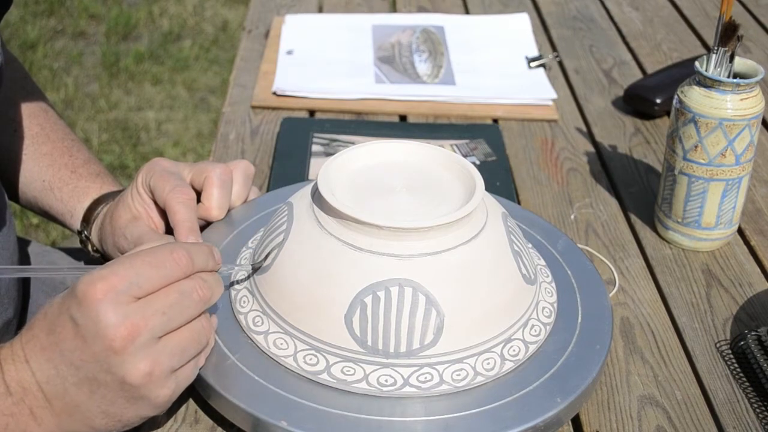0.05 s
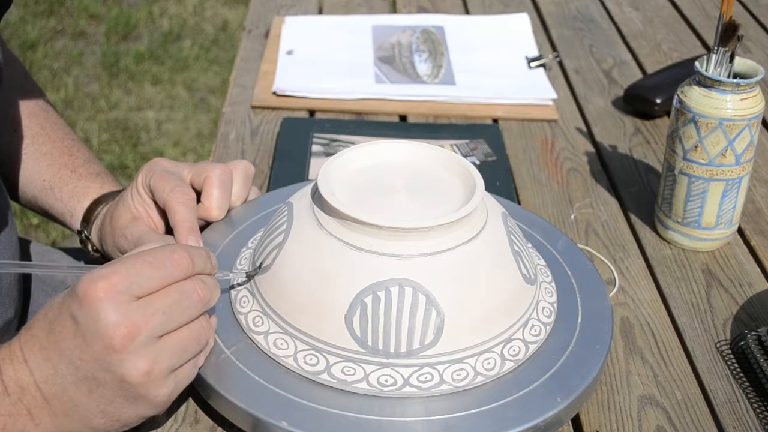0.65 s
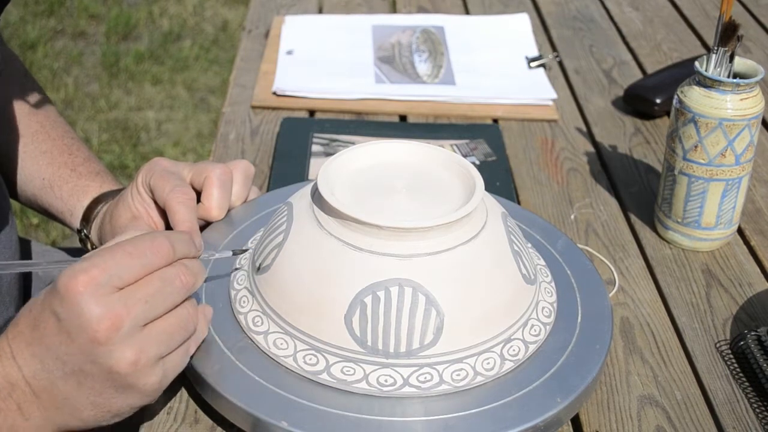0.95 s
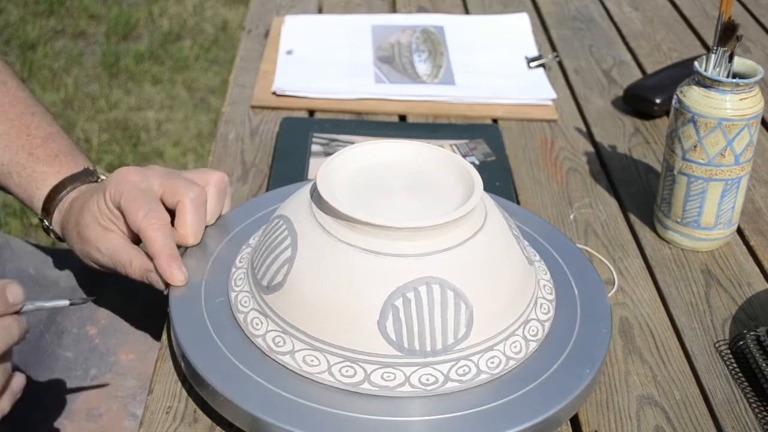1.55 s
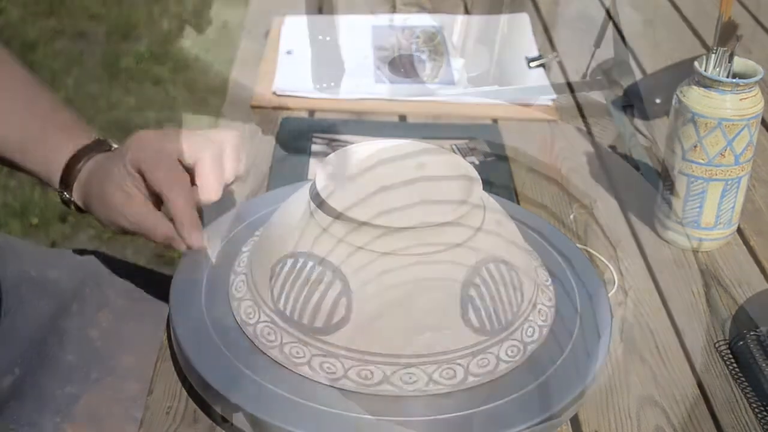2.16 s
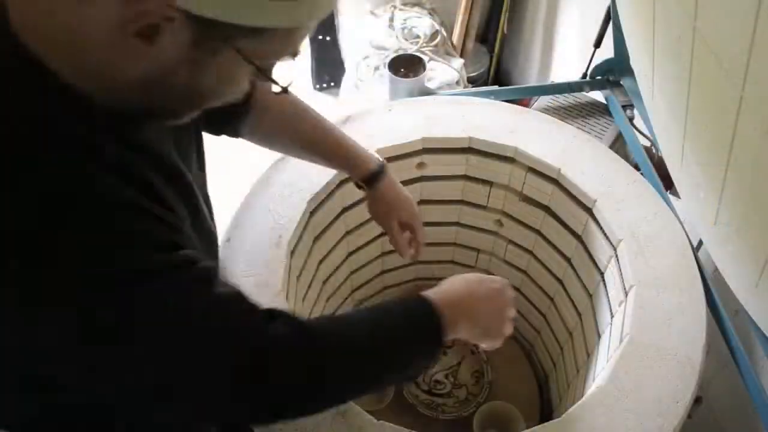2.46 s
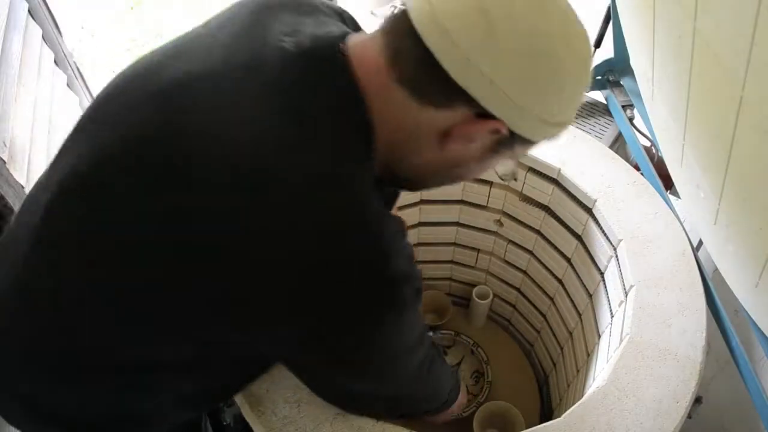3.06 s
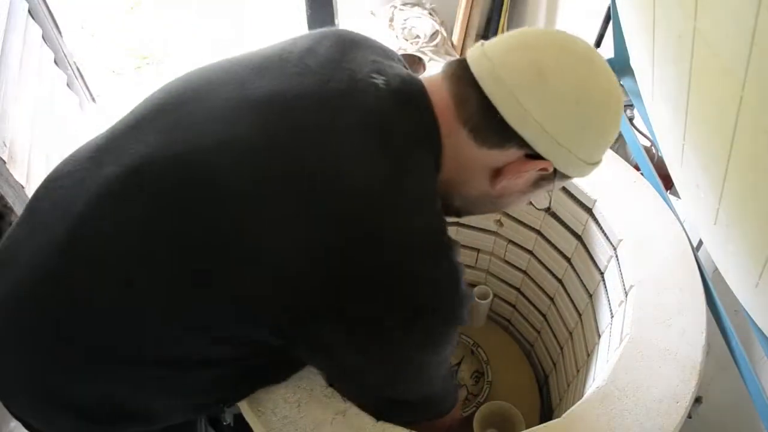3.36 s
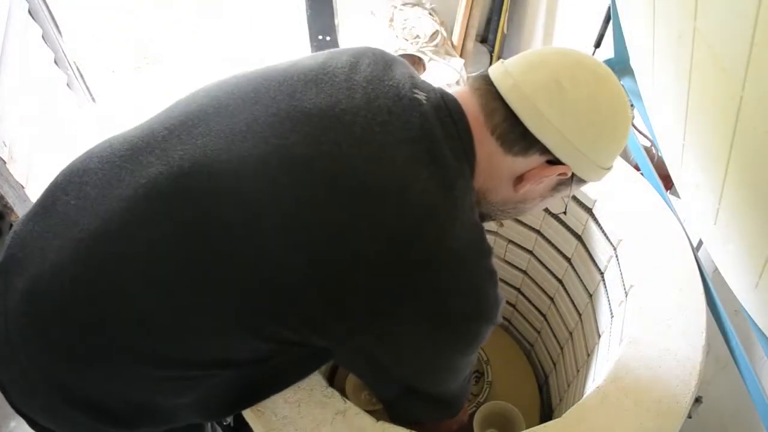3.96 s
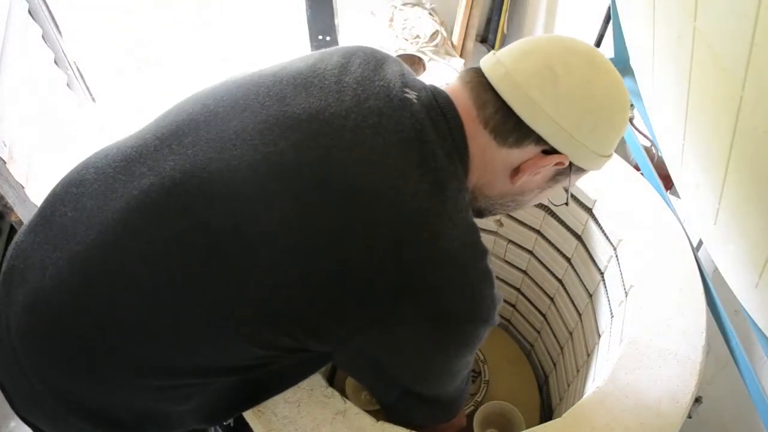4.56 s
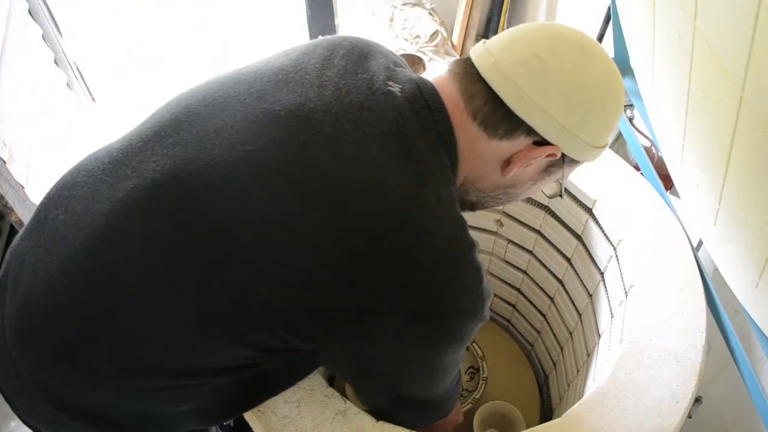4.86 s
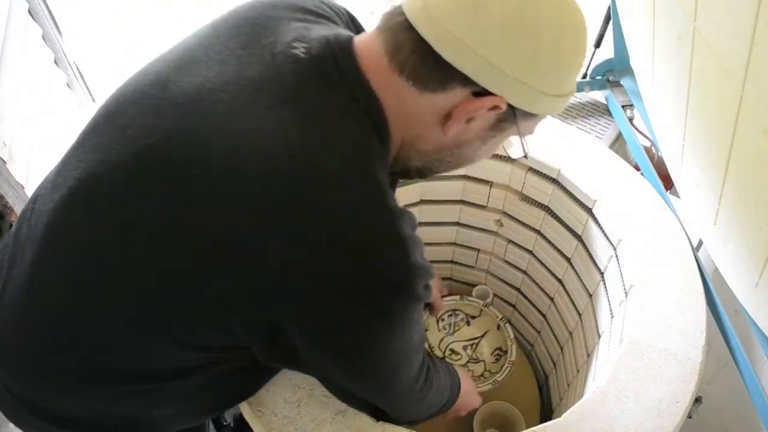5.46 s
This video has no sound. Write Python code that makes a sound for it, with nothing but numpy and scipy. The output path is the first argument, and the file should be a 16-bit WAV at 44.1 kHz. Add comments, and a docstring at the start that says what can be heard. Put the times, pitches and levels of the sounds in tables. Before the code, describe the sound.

Breeze and low wind thumps on the microphone give way to quieter air, a short gritty scrape, and a soft pottery knock.

```python
"""A clay bowl is lowered into a brick kiln: one gritty scrape, a few ticks, a brush of the potter's
sleeve, then a soft rubbing knock that rings the ware. Grains catch and slip to make each rub.
Before this we are at his outdoor painting table, where a breeze hisses in the leaves and gusts
buffet the microphone with rumble and slaps. That scene dissolves into the quieter air of the
kiln shed, with birds whistling far off."""
import sys
import numpy as np
from scipy import signal
from scipy.fft import rfft, irfft, next_fast_len
from scipy.io import wavfile
from scipy.ndimage import uniform_filter1d

SR = 44100
rng = np.random.default_rng(int(sys.argv[2]) if len(sys.argv) > 2 else 0)


def generate_wav(sig):
    """Save sig (samples, or channels by samples) to the path in sys.argv[1] as 16-bit PCM at SR."""
    pcm = np.round(np.clip(np.atleast_2d(sig).T, -1, 1) * 32767).astype(np.int16)
    wavfile.write(sys.argv[1], SR, pcm)


N = 251811
TIME, BINS = np.arange(N) / SR, np.fft.rfftfreq(N, 1 / SR)
DISSOLVE_START_S, DISSOLVE_END_S = 2, 2.49

# Tone of the leaves and of the shed air. Each row: frequency in Hz, relative level in dB.
LEAF_COLOUR = [(40, -6), (120, -13.5), (300, -4.5), (500, 0.5), (900, 0), (1900, -2.5), (3600, -3.5),
               (5000, -8), (6500, -13), (9000, -15.5), (11000, -22)]
SHED_COLOUR = [(25, -25), (60, -13.5), (120, -9), (250, -3), (500, 0), (900, -1.5), (1500, -3.5),
               (2200, -5), (3600, -6.5), (4600, -10.5), (6500, -15), (9000, -18.5), (11000, -23)]
# Strength of the breeze, ahead of the dissolve. Each row: time in seconds, level in dB.
BREEZE_LEVEL = [(.6, -56.5), (1.3, -56), (2.0, -56)]
# Far birds. Each row: start in seconds, length in seconds, starting pitch in Hz, level in dB.
BIRD_NOTES = [(2.6, .31, 5050, -70), (2.7, .17, 4720, -76), (3.07, 0.16, 3520, -71.5),
              (3.5, 0.31, 3690, -74), (3.83, .38, 3070, -73), (4.44, .26, 3870, -70.5),
              (5.18, .47, 2720, -74.5)]
# Gusts on the microphone. Each row: peak time in seconds, strength in dB, half-width in seconds.
GUST_SWELLS = [(.19, -52, 0.023), (.26, -45, .03), (.45, -60.5, 0.11), (.57, -49.5, 0.033),
               (.67, -55, 0.022), (.78, -55.5, 0.038), (1.358, -42.5, .024), (1.465, -41, .025),
               (1.535, -39, 0.045), (1.68, -37, .056), (1.81, -47, .08), (2.07, -56.5, 0.029),
               (2.17, -58.5, .035), (2.29, -61.5, .025), (2.38, -53, .022)]
# Tone of their rumble. Each row: frequency in Hz, relative level in dB.
GUST_COLOUR = [(12, -39), (25, -17), (55, 2.5), (120, 1.5), (200, -5.5), (300, -10.5), (420, -15.5),
               (600, -22.5), (1000, -67)]
# The hardest eddies, which slap the microphone. Each row: time in seconds, strength in dB.
EDDY_SLAPS = [(.228, -41), (0.5592, -39), (.67, -39), (1.3709, -33), (1.5082, -28), (1.5548, -20.5),
              (1.672, -30.5), (1.7046, -18.5), (1.7436, -32), (1.772, -33), (1.836, -40), (2.293, -46)]
# Small ticks of brush and ware. Each row: start in seconds, strength in dB, centre in Hz,
# spread in octaves, time to fall 60 dB in seconds.
WARE_TICKS = [(2.2007, -40.5, 3300, 0.9, 0.08), (2.26, -49.5, 6000, 1.1, .1), (2.468, -57, 7000, .05, .08),
              (2.943, -42.5, 4300, 1.5, .11), (3.233, -57, 8000, .6, .08), (4.215, -48.5, 5000, 0.75, 0.06),
              (4.288, -60, 6400, .015, 0.16), (4.732, -49, 3000, 0.47, .035)]
# Three rubs: sleeve on the kiln rim, clay dragged over firebrick, bowl settling on its shelf.
# Each row: start in seconds, attack in seconds, top level in dB, time to fall 60 dB in seconds.
SLEEVE_MOVES = [(2.96, .125, -61.5, .28)]
SCRAPE_MOVES = [(2.527, 0.047, -39.5, 0.29)]
SETTLE_MOVES = [(4.283, 0.014, -67, .9), (4.35, .052, -51, 0.21)]
# Tone of the cloth or grit in each rub. Each row: frequency in Hz, relative level in dB.
SLEEVE_COLOUR = [(60, -24), (150, -10), (300, 3.5), (600, -9), (1500, -0.5), (2400, -10), (5000, -22),
                 (11000, -24)]
SCRAPE_COLOUR = [(80, -31), (190, -10), (360, -12), (500, 0), (800, -3.5), (1020, -5), (1500, -2),
                 (2600, -6.5), (4000, -5.5), (5200, -12.5), (6300, -14), (9200, -18), (11000, -22.5)]
SETTLE_COLOUR = [(70, -35), (140, -13), (220, -1.5), (400, -3), (720, -10), (950, -3.5), (1200, -20),
                 (1500, -7), (1900, -23.5), (3300, -22), (5000, -28), (7000, -29.5), (9400, -26),
                 (11000, -21)]
# Ring of bowl and brick. Each row: frequency in Hz, width in Hz, level against the grit in dB.
SCRAPE_MODES = [(631, 16, 10), (789, 21, 9), (1323, 29, 7), (1590, 93, 0), (2330, 36, 4), (3050, 40, -1),
                (3450, 36, 4.5), (3860, 45, -2), (4450, 50, -1), (5020, 100, 4), (6700, 61, -8)]
SETTLE_MODES = [(234, 22, 8.1), (394, 15, 4), (480, 28, 3.4), (631, 13, 18.6), (848, 16, 10),
                (910, 25, 3.3), (2146, 20, 19), (3350, 7.2, 29.6), (4350, 40, 15), (4680, 35, 16),
                (5858, 14, 24.5), (6450, 29, 27), (7180, 33, 18), (8110, 30, 22), (8598, 25, 19),
                (9050, 70, 16), (9470, 54, 13)]


def amp(db):
    """Decibels to gain."""
    return 10 ** (np.asarray(db) / 20)


def unit(x):
    """Scales to rms 1."""
    return x / np.sqrt(np.mean(x ** 2) + 1e-20)


def colour(rows, hz):
    """An EQ curve from rows of frequency and dB."""
    points_hz, db = np.transpose(rows)
    return amp(np.interp(np.log(hz + 1), np.log(points_hz), db))


def shaped(x, gain):
    """Filters by a gain for every frequency."""
    return irfft(rfft(x) * gain, N)


def drift(rate_hz):
    """Slow random wander of rms 1."""
    size = next_fast_len(N)
    hz = np.fft.rfftfreq(size, 1 / SR)
    spectrum = rfft(rng.standard_normal(size)) * np.exp(-(hz / rate_hz) ** 2)
    return unit(irfft(spectrum, size)[:N])


def add(mix, start, sound):
    """Lays a sound into the mix at a start in seconds."""
    part = mix[round(start * SR):][:len(sound)]
    part += sound[:len(part)]


def air(spectrum, patchy_db):
    """A bed of moving air: wide noise with small patches that come and go."""
    hz, _, frames = signal.stft(rng.standard_normal(N), SR, nperseg=2048, noverlap=1536)
    patches = uniform_filter1d(rng.standard_normal(frames.shape), size=20, axis=0)  # across frequency
    patches = unit(uniform_filter1d(patches, size=9, axis=1))  # across time
    frames = frames * colour(spectrum, hz)[:, None] * amp(patchy_db * patches)
    return unit(signal.istft(frames, SR, nperseg=2048, noverlap=1536)[1][:N])


def breeze():
    """Leaves stirring in a light wind: a nearly steady hiss."""
    level_db = np.interp(TIME, *np.transpose(BREEZE_LEVEL))
    return air(LEAF_COLOUR, patchy_db=0.66) * amp(level_db)


def whistle(length, hz, db, sag_per_s=.1, waver=.005, blur=1.2, blur_hz=85):
    """One thin bird note that sags in pitch, smeared by distance."""
    count = round(length * SR)
    pitch = hz * (1 - sag_per_s * TIME[:count]) * (1 + waver * drift(rate_hz=26)[:count])
    tone = np.exp(2j * np.pi * np.cumsum(pitch) / SR)
    scatter = 1 + blur * (drift(blur_hz) + 1j * drift(blur_hz))
    return amp(db) * unit((scatter[:count] * tone).real) * signal.windows.tukey(count, .6)


def birds(faint_count=5):
    """Far birds: the clearer whistles, and a few fainter ones at random times and pitches."""
    out = np.zeros(N)
    faint = [(rng.uniform(3.1, 3.6), .3, rng.uniform(2680, 3150), -77) for _ in range(faint_count)]
    for start, length, hz, db in BIRD_NOTES + faint:
        add(out, start, whistle(length, hz, db))
    return out


def gusts(lull_db=-70, lumpy_db=3):
    """Low, lumpy turbulence on the microphone: gusts swell over a lull, then leave with the garden."""
    rumble = unit(shaped(rng.standard_normal(N), colour(GUST_COLOUR, BINS)))
    buffeting = unit(rumble * amp(lumpy_db * drift(rate_hz=45)))
    gust_power = sum(amp(db) ** 2 * np.exp(-2 * ((TIME - peak) / width) ** 2)
                     for peak, db, width in GUST_SWELLS)
    fade_out = np.clip((DISSOLVE_END_S - TIME) / 0.12, 0, 1)
    return buffeting * np.sqrt(amp(lull_db) ** 2 + gust_power) * fade_out


def eddies(strongest_hz=202.5, db_per_octave=40, crest_db=-14, crest_ratio=1.82):
    """Each eddy is a push of pressure with suction either side; strong ones are quicker and steeper."""
    out = np.zeros(N)
    strongest_db = max(db for _, db in EDDY_SLAPS)
    for when, db in EDDY_SLAPS:
        relative_db = db - strongest_db
        hz = strongest_hz * 2 ** (relative_db / db_per_octave)
        phase_squared = (np.pi * hz * (TIME - when)) ** 2
        near = phase_squared < 20
        wide = phase_squared[near]
        narrow = wide * crest_ratio ** 2
        push = (1 - 2 * wide) * np.exp(-wide)
        crest = (1 - 2 * narrow) * np.exp(-narrow)
        out[near] += amp(db) * (push + amp(crest_db + .5 * relative_db) * crest)
    return out


def shed_echo(dry, t60=0.33, wet_db=-9, reflections_per_s=2000):
    """Adds a short scatter of reflections from the kiln and the walls."""
    t = TIME[:SR // 2]
    taps = rng.standard_normal(len(t)) * (rng.random(len(t)) < reflections_per_s / SR)
    taps *= (t > .004) * amp(-60 * t / t60)  # pre-delay and decay
    return dry + amp(wet_db) * signal.fftconvolve(dry, taps / np.linalg.norm(taps))[:N]


def ticks(trim_db=-9, rise_s=0.00093, crack=0.57, crack_s=0.0028):
    """Light contacts of brush and ware: a sharp crack, then a short burst, broad or tinkling."""
    out, t = np.zeros(N), TIME[:SR // 4]
    attack = 1 - np.exp(-t / rise_s)
    for start, db, hz, spread, t60 in WARE_TICKS:
        band = np.exp(-.5 * (np.log2((BINS + 1) / hz) / spread) ** 2)
        burst = unit(shaped(rng.standard_normal(N), band))[:len(t)]
        decay = amp(-60 * t / t60) + crack * np.exp(-t / crack_s)
        add(out, start, amp(db + trim_db) * burst * attack * decay)
    return out


def stroke(start, attack, db, t60, attack_curve=0.66):
    """Force of one stroke: it builds to a peak, then dies away."""
    t = TIME - start
    press = np.clip(t / attack, 0, 1) ** attack_curve
    return press * amp(db - 60 * np.maximum(t - attack, 0) / t60)


def rub(moves, texture, modes, grains_per_s, grain_spread_db):
    """Clay grains or cloth fibres catch and slip under each stroke; any modes given ring on."""
    slips = (rng.random(N) < grains_per_s / SR) * rng.choice([-1., 1.], N)
    slip_sizes = amp(grain_spread_db * np.minimum(rng.exponential(1, N), 3))
    force = sum(stroke(*move) for move in moves)
    ring = sum(amp(db) / (1 + 2j * (BINS - hz) / width) for hz, width, db in modes)
    body = unit(colour(texture, BINS) * (1 + ring))
    return shaped(unit(slips * slip_sizes) * force, body)


def scene():
    """The windy garden crossfades into the shed, where the bowl goes into the kiln."""
    indoors = np.clip((TIME - DISSOLVE_START_S) / (DISSOLVE_END_S - DISSOLVE_START_S), 0, 1)
    garden = breeze() * np.sqrt(1 - indoors)
    shed = air(SHED_COLOUR, patchy_db=1.14) * amp(-60.5) * np.sqrt(indoors)
    scrape = rub(SCRAPE_MOVES, SCRAPE_COLOUR, SCRAPE_MODES, grains_per_s=4000, grain_spread_db=1.9)
    sleeve = rub(SLEEVE_MOVES, SLEEVE_COLOUR, modes=[], grains_per_s=720, grain_spread_db=3.5)
    settle = rub(SETTLE_MOVES, SETTLE_COLOUR, SETTLE_MODES, grains_per_s=2100, grain_spread_db=4)
    handling = shed_echo(scrape + sleeve + settle + ticks())
    return (garden + shed + gusts() + eddies() + birds() + handling)[None]


def record(dry):
    """The microphone has a narrow dip in the treble, and the top end rolls off steeply."""
    dip_hz, dip_half_width_hz, dip_depth = 7900, 190, 0.61
    roll_off_hz, cutoff_hz = 9900, 10950
    dip = 1 - dip_depth / (1 + ((BINS - dip_hz) / dip_half_width_hz) ** 2)
    roll_off = 1 / np.sqrt(1 + (BINS / roll_off_hz) ** 30)
    low_pass = signal.firwin(401, cutoff_hz, window=("kaiser", 8), fs=SR)
    return signal.oaconvolve(shaped(dry[0], dip * roll_off), low_pass, "same")[None]


dry = scene()
out = record(dry)
generate_wav(out)
```